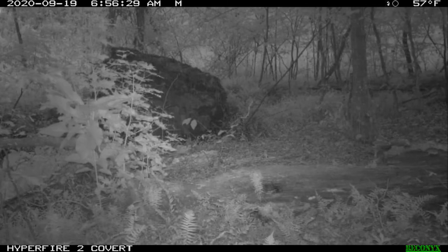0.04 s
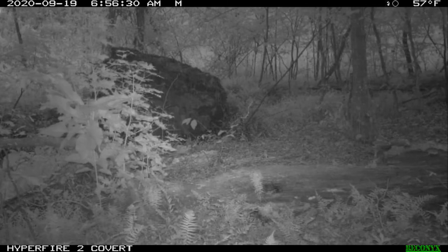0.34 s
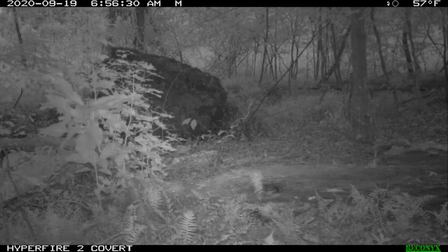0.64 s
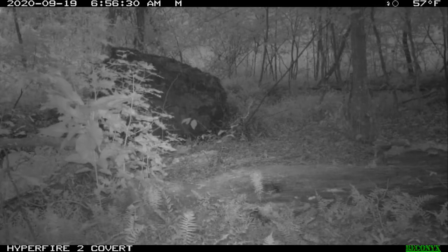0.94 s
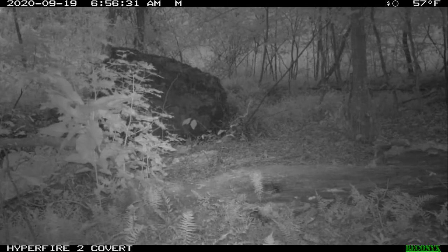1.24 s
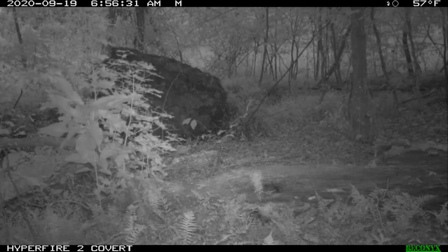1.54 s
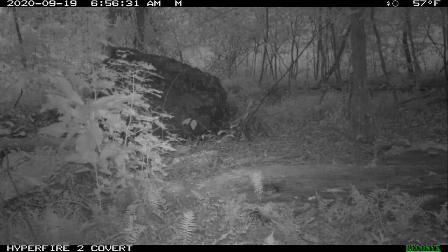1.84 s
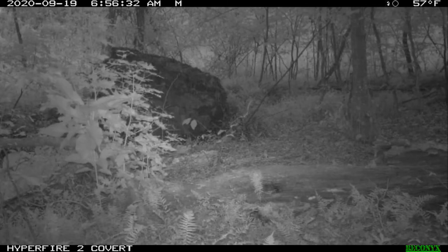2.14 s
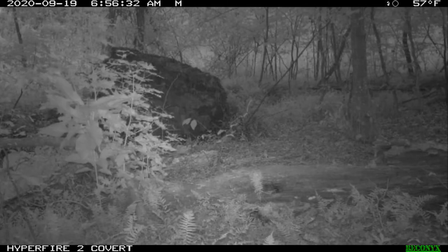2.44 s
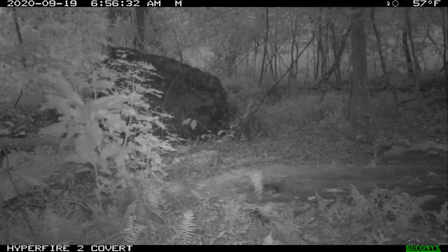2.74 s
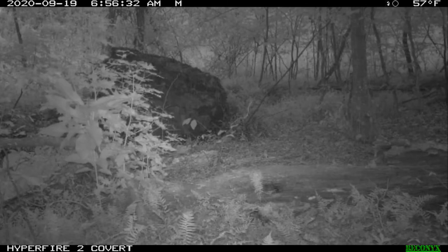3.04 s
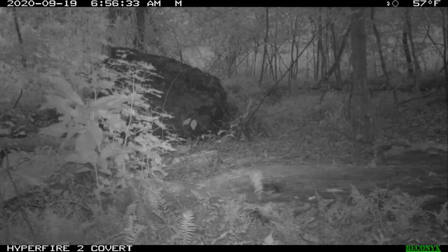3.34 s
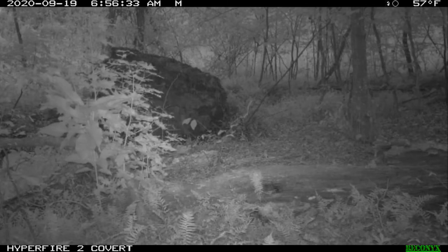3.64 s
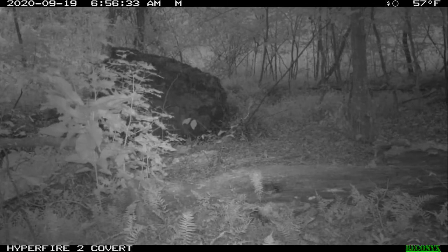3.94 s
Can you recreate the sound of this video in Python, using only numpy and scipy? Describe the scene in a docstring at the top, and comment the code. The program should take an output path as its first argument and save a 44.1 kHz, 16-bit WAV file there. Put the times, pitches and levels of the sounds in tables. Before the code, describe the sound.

Five short, high squeaks come from a hidden bird or small animal in a wood, three first, then two after a pause. A steady insect chorus runs underneath, with low wind buffeting on the microphone and faint, dull taps.

```python
"""Thin squeaks in a wood

A small unseen animal, perhaps a bird, gives five thin squeaks: sagging whistles with a rasp on top.
Trunks and leaves scatter each into a short tail. A chorus of insects hisses steadily behind it,
light wind bumps the microphone, and a few dull taps sound close by. It all fades out at the end."""
import sys
import numpy as np
from scipy import signal
from scipy.fft import rfft, irfft, next_fast_len
from scipy.io import wavfile
from scipy.ndimage import uniform_filter1d, map_coordinates

SR = 44100
rng = np.random.default_rng(int(sys.argv[2]) if len(sys.argv) > 2 else 0)


def bounce(signal):
    """Save signal as a 16-bit WAV file at the path given by the first command-line argument."""
    frames = np.transpose(np.atleast_2d(signal))
    limited = np.clip(frames, -1, 1)
    pcm = np.round(limited * 32767).astype(np.int16)
    wavfile.write(sys.argv[1], SR, pcm)


N = 176400

# The animal's whistles; slur_db is relative to the held note, extra_tail_db adds to WOOD_DB:
# start_s, hold_s, level_db, pitch_hz, sag_hz_per_s, slur_db, attack_s, husk_db, extra_tail_db,
# slur_hz_per_s
SQUEAKS = [(0.484, 0.037, -37.5, 4045, 1090, -7.5, .016, -81, -7.5, 2500),
           (0.987, 0.042, -39.7, 4096, 994, -8, 0.0067, -62, -5.5, 6930),
           (1.549, 0.028, -38.5, 4087, 700, -12, 0.008, -66, -2, 5900),
           (2.743, 0.014, -37, 4167, 5900, -9.5, 0.0016, -56.5, 1, 6900),
           (3.36, 0.012, -33.5, 4210, 6000, -10, 0.0011, -61, -2, 8000)]
# Colour of the husky noise in a squeak: frequency_hz, relative_db
HUSK_SPECTRUM = [(2500, -21), (3300, -7.5), (4200, -4), (5100, 3.5), (6000, -4.5), (7200, -9), (8500, -29)]
# The squeaks' upper voice, thin at first, then rasping: start_s, length_s, level_db, pitch_hz, width_hz
RASPS = [(0.449, 0.029, -56.5, 7500, 426), (0.478, .028, -65.5, 8060, 200), (0.509, .014, -60.5, 7780, 330),
         (0.986, 0.035, -66, 7950, 200), (1.015, 0.026, -60.5, 7730, 399), (1.547, 0.037, -66, 7980, 150),
         (1.576, 0.029, -59, 7750, 380), (2.757, 0.017, -64.5, 7830, 350), (2.775, 0.015, -59.5, 7750, 395),
         (3.385, 0.025, -62, 7700, 402)]
# Reflections off the trunks: shortest_delay_s, gain_db
TRUNK_ECHOES = [(.021, -8.5), (0.033, -23), (0.052, -11.5), (0.066, -26)]
# Colour of the far insect chorus: frequency_hz, relative_db
CHORUS_SPECTRUM = [(1410, -49.5), (2400, -23.5), (2870, -14.5), (3320, -8), (3910, -9), (4230, -1),
                   (4480, 2.5), (5210, -13.5), (7330, -27), (8400, -42), (10900, -65.5), (18500, -120)]
# Nearer, trilling insects: pitch_hz, width_hz, level_db, pulse_rate_hz, drift_db
TRILLERS = [(3270, 170, -65.5, 37, 2.5), (4400, 35, -64.5, 57, 0.2)]
# Gentle swells of the lower insect band: peak_s, level_db
INSECT_SWELLS = [(.44, -56), (.88, -57.5), (1.33, -58), (1.67, -60), (1.83, -57.5), (2.4, -79), (3.04, -59),
                 (3.3, -66), (3.62, -59.5)]
# The wind's rise and fall: time_s, relative_db
WIND_STRENGTH = [(0.0, -42), (0.19, -52), (0.25, -40), (0.31, -43), (0.36, -46), (0.43, -42), (0.48, -45.5),
                 (0.55, -35.5), (0.61, -37), (0.66, -46.5), (0.8, -36.5), (0.88, -48), (.98, -50),
                 (1.05, -41), (1.14, -44.5), (1.25, -39), (1.44, -39), (1.57, -36.5), (1.66, -46),
                 (1.75, -35), (1.82, -44.5), (1.89, -29), (1.97, -41.5), (2.03, -29), (2.12, -43.5),
                 (2.22, -52.5), (2.29, -38), (2.42, -37.5), (2.48, -42), (2.55, -28), (2.62, -44.5),
                 (2.86, -50), (2.97, -33.5), (3.11, -49.5), (3.22, -39.5), (3.4, -45), (3.68, -39),
                 (3.73, -47), (3.78, -37)]
# Colour of the wind's buffeting: frequency_hz, relative_db
RUMBLE_SPECTRUM = [(8, -4), (18, 4), (30, 5.5), (45, -8), (65, -12), (100, -24), (150, -32), (300, -57.5),
                   (800, -88)]
# Sharper bumps of air on the microphone: peak_s, peak_db, pitch_hz
AIR_BUMPS = [(0.23, -33, 50), (0.262, -31.5, 35.2), (0.296, -26, 44.7), (.435, -32, 78.3),
             (0.591, -48, 69.4), (.734, -40.5, 69), (1.034, -38.5, 48.7), (1.187, -35, 76),
             (1.219, -33.5, 66), (1.31, -36, 56), (1.368, -39, 70), (1.493, -32, 64), (1.521, -36, 62.7),
             (1.565, -26.5, 37.2), (1.712, -28, 65.3), (1.767, -32.5, 56.6), (1.892, -29.5, 38.6),
             (1.936, -30, 54), (2.072, -25.5, 69.4), (2.158, -38, 54.2), (2.53, -31, 53)]
# Soft taps close by: start_s, level_db, pitch_hz
TAPS = [(1.295, -58, 235), (1.364, -60, 178.7), (2.024, -52.5, 229), (2.535, -55.5, 218)]
# Colour of a tap's scuff: frequency_hz, relative_db
SCUFF_SPECTRUM = [(120, -10), (250, -6.5), (500, -5), (1500, -1.5), (3000, -15), (8000, -49.5)]
# Colour of the wood's faint rush: frequency_hz, relative_db
AIR_SPECTRUM = [(100, 4.5), (200, -0.5), (350, -0.5), (600, -4.5), (1000, -8), (1600, -8), (2400, -7),
                (3500, -10), (8000, -36)]
# The closing fade: time_s, gain_db
FADE_OUT = [(0, 0), (3.66, -0.5), (3.76, -4), (3.84, -8.5), (3.9, -14), (3.945, -27.5), (3.965, -102)]

WOOD_T60_S, WOOD_DB = 0.52, -4.5  # decay time and send level of the wood's tail
SOFT_EDGE_S = 0.0078  # attack and release of the rasps and the lead-in


def squeaks(slur_s=0.025, release_s=0.0025, slur_step_hz=34.8, waver_hz=31.5, slur_waver_hz=88.5,
            flutter_db=2.2, slur_send_db=-12):
    """Each whistle sags, then slurs down, softer and rougher; the slur carries more into the wood."""
    out = np.zeros(N)
    for start, hold, db, hz, sag, slur_db, attack, husk_db, extra_tail_db, slur_rate in SQUEAKS:
        t = np.arange(N) / SR - start
        slur_time = np.clip(t - hold, 0, 2 * slur_s)
        slurring = 1 - np.exp(-slur_time / release_s)  # 0 on the held note, 1 in the slur
        pitch = hz - sag * np.clip(t, 0, hold + slur_s)
        pitch -= slur_rate * slur_time + slur_step_hz * slurring
        pitch += (waver_hz + slur_waver_hz * slurring) * wobble(500)
        held = gate(t, hold, attack, release_s)
        whole = gate(t, hold + slur_s, attack, release_s)
        whistle = amp(db + flutter_db * wobble(500)) * tone(pitch)
        husk = amp(husk_db) * whole * noise(HUSK_SPECTRUM)
        call = np.maximum(held, amp(slur_db) * whole) * whistle + husk
        send = call + amp(slur_send_db) * slurring * whole * whistle
        out += call + amp(WOOD_DB + extra_tail_db) * wood_tail(send, WOOD_T60_S) + trunk_echoes(call)
    return out


def rasps(tail_db=-2.5, t60_s=0.32):
    """The squeaks' rough upper voice: narrow bursts of noise, scattered by the leaves."""
    out = np.zeros(N)
    for start, length, db, hz, width in RASPS:
        envelope = gate(np.arange(N) / SR - start, length, SOFT_EDGE_S, SOFT_EDGE_S)
        call = amp(db) * envelope * band_noise(hz, width)
        out += call + amp(tail_db) * wood_tail(call, t60_s)
    return out


def lead_in(start_s=0.452, length_s=0.032, level_db=-50.5, pitch_hz=3680, rise_hz_per_s=4000,
            waver_hz=260):
    """A soft rising note, hoarse with fast pitch waver, runs into the first squeak."""
    t = np.arange(N) / SR - start_s
    pitch = pitch_hz + rise_hz_per_s * np.clip(t, 0, length_s) + waver_hz * wobble(990)
    call = amp(level_db) * gate(t, length_s, SOFT_EDGE_S, SOFT_EDGE_S) * tone(pitch)
    return call + amp(WOOD_DB) * wood_tail(call, WOOD_T60_S)


def wood_tail(call, t60_s, build_s=0.066):
    """Leaves and trunks scatter a call into a diffuse tail, as strong as the call and new each time."""
    t = np.arange(SR) / SR
    impulse = rng.standard_normal(SR) * amp(-60 * t / t60_s) * (1 - np.exp(-t / build_s))
    return unit(signal.fftconvolve(call, impulse)[:N]) * np.std(call)


def trunk_echoes(call):
    """Short slaps off the trunks, their timing a little different for every call."""
    out = np.zeros(N)
    for delay, db in TRUNK_ECHOES:
        lag = int(delay * SR * rng.uniform(1.0, 1.1))
        out += amp(db) * np.pad(call, (lag, 0))[:N]
    return out


def insects(chorus_db=-50.9, chorus_drift_db=0.25, trill_depth=0.28, swell_s=0.045):
    """A far chorus merged into hiss, two pulsing bands from nearer insects, and a few soft swells."""
    t = np.arange(N) / SR
    out = amp(chorus_db + chorus_drift_db * wobble(8.5)) * noise(CHORUS_SPECTRUM)
    for hz, width, db, pulse_rate, drift_db in TRILLERS:
        pulsing = 1 + trill_depth * tone(pulse_rate * (1 + 0.12 * wobble(8)))
        out += amp(db + drift_db * wobble(3.3)) * band_noise(hz, width) * pulsing
    swells = sum(amp(db) * bell(t - peak, swell_s) for peak, db in INSECT_SWELLS)
    return out + swells * band_noise(hz=3404, width_hz=170)


def wind_rumble(trim_db=-2, even_s=0.046):
    """Low buffeting on the microphone, evened out so that it follows the wind's strength."""
    rumble = noise(RUMBLE_SPECTRUM)
    power = np.abs(uniform_filter1d(rumble ** 2, int(even_s * SR)))
    evened = unit(rumble / np.sqrt(power + 0.11))
    return amp(curve(WIND_STRENGTH) + trim_db) * evened


def wind_bumps(width_cycles=0.52, edge_db=-13, edge_ratio=1.92):
    """Rounded pushes of air hit the microphone, each with a sharper edge."""
    def push(cycles):
        return np.cos(2 * np.pi * cycles) * bell(cycles, width_cycles)

    out = np.zeros(N)
    for peak, db, hz in AIR_BUMPS:
        cycles = (np.arange(N) / SR - peak) * hz
        edge = amp(edge_db) * push(edge_ratio * cycles)
        out += amp(db) * (push(cycles) + edge) / (1 + amp(edge_db))
    return out


def taps(scuff_db=-9, attack_s=0.0038, decay_s=0.021):
    """Faint, dull contacts: a low ring that dies at once, and a slight scuff."""
    scuff = amp(scuff_db) * noise(SCUFF_SPECTRUM)
    out = np.zeros(N)
    for start, db, hz in TAPS:
        envelope = gate(np.arange(N) / SR - start, attack_s, attack_s, decay_s)
        out += amp(db) * envelope * (tone(np.full(N, hz)) + scuff)
    return out


def air(level_db=-61.5):
    """The faint, steady rush of the wood."""
    return amp(level_db) * noise(AIR_SPECTRUM)


def amp(db):
    """Decibels to gain."""
    return 10 ** (np.asarray(db) / 20)


def unit(x):
    """Scale to rms 1."""
    return x / np.sqrt(np.mean(x ** 2) + 1e-20)


def curve(rows):
    """One value per sample from (time_s, value) rows."""
    return np.interp(np.arange(N) / SR, *np.transpose(rows))


def bell(x, width):
    """A Gaussian hump of height 1 around zero."""
    return np.exp(-0.5 * (x / width) ** 2)


def wobble(rate_hz):
    """Smooth random modulation, rate_hz new values a second."""
    return map_coordinates(rng.standard_normal(8000), [np.arange(N) * rate_hz / SR], mode="wrap")


def gate(t, length_s, attack_s, release_s):
    """Attack, hold until length_s, release."""
    return np.clip(t / attack_s, 0, 1) * np.exp(-np.maximum(t - length_s, 0) / release_s)


def tone(hz):
    """A sine of rms 1 along a pitch curve."""
    return np.sqrt(2) * np.sin(2 * np.pi * np.cumsum(hz) / SR)


def filtered(x, response):
    """Equalise x with a gain that depends on frequency."""
    size = next_fast_len(N + SR // 2)
    return irfft(rfft(x, size) * response(np.fft.rfftfreq(size, 1 / SR)), size)[:N]


def noise(spectrum):
    """Noise of rms 1, coloured by (frequency_hz, relative_db) rows."""
    hz, db = np.transpose(spectrum)
    white = rng.standard_normal(N)
    return unit(filtered(white, lambda f: amp(np.interp(np.log(f + 1), np.log(hz + 1), db))))


def band_noise(hz, width_hz):
    """A narrow band of noise of rms 1."""
    return unit(filtered(rng.standard_normal(N), lambda f: bell(f - hz, width_hz)))


def scene():
    """The animal in front; insects, wind, taps and air around it, in mono."""
    animal = lead_in() + squeaks() + rasps()
    return (animal + insects() + wind_rumble() + wind_bumps() + taps() + air())[None]


def record(dry, top_hz=8700):
    """The closing fade, then the camera's narrow band: a steep treble cut."""
    faded = dry[0] * amp(curve(FADE_OUT))
    return filtered(faded, lambda hz: 1 / np.sqrt(1 + (hz / top_hz) ** 120))[None]


dry = scene()
out = record(dry)
bounce(out)
```